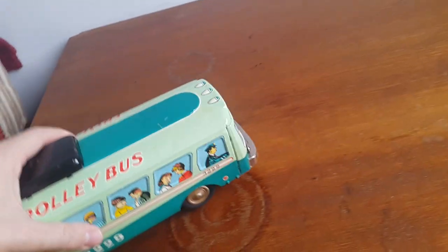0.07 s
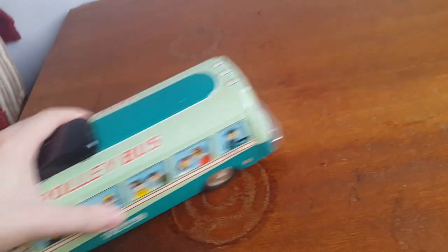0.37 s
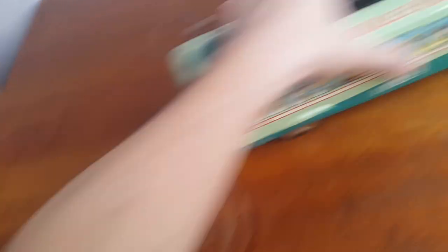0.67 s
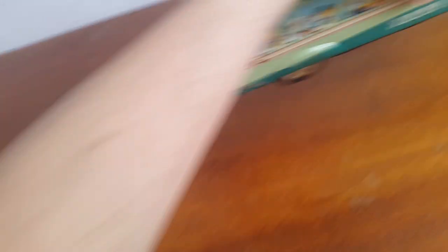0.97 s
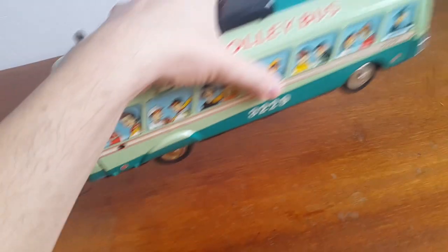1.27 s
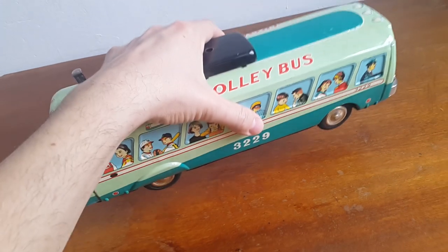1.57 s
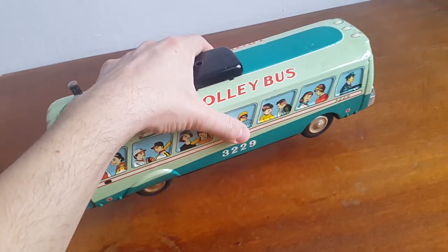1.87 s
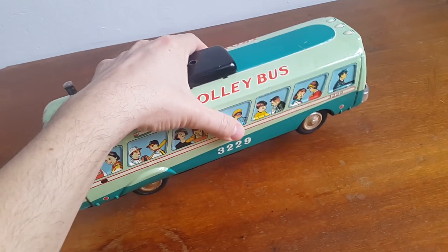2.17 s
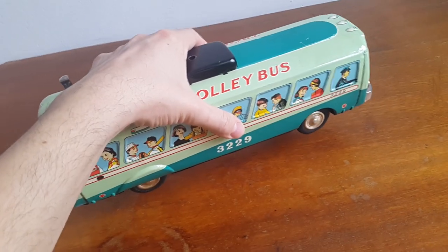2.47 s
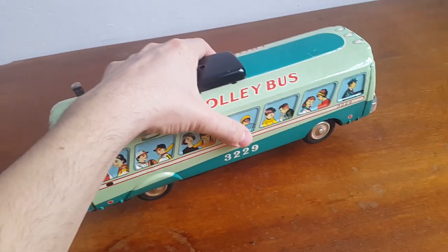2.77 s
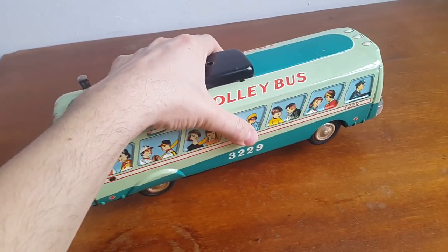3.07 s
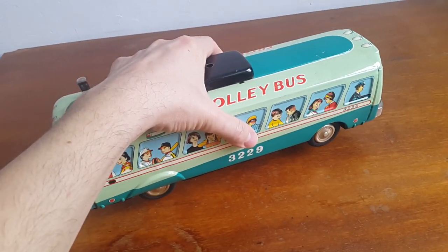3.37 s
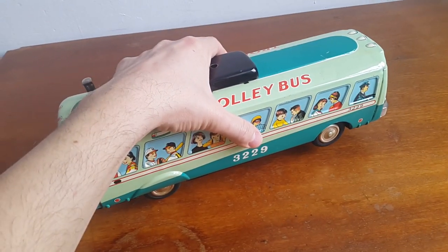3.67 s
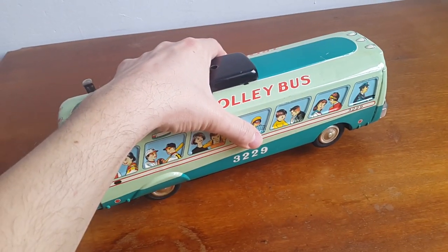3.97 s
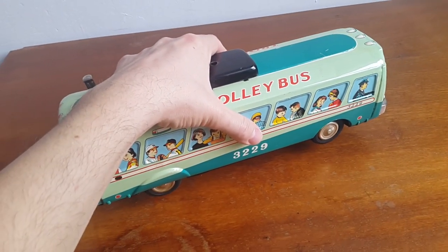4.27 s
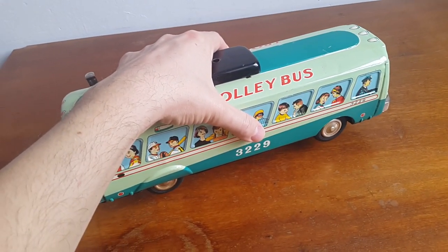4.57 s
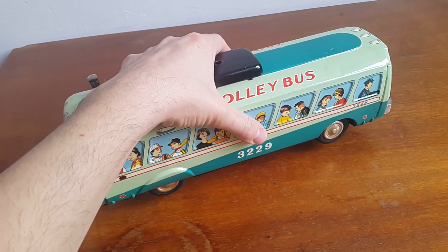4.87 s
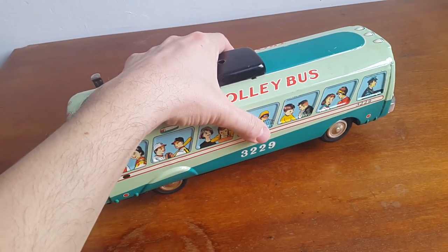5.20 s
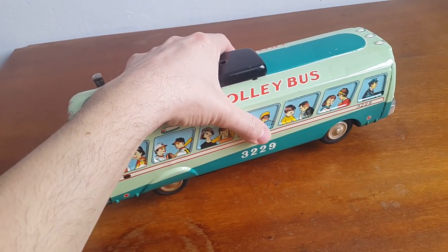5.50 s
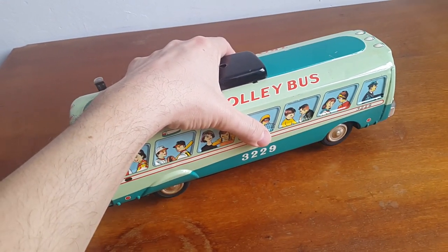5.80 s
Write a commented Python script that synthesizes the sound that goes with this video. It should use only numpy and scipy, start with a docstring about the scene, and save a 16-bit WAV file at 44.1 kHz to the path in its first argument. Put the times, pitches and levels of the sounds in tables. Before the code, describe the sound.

A tin toy bus clacks lightly as it is nudged, then is shoved across a wooden table, wheels drumming and axle rubbing while its friction motor winds up. After a sharp knock the flywheel runs on freely with a loud, steady whine that slowly falls in pitch, and loose gear teeth rattle the hollow metal body. It is heard close up and slightly to the left in a small room.

```python
"""The friction flywheel of a tin toy bus, shoved across a wooden table and lifted so that it runs on freely.
Its eight-tooth pinion whines and slowly sinks in pitch, the overtones swelling as they pass the panel
resonances, while loose gear teeth rattle the hollow tin body. During the shove the axles knock and rub
and the wheels drum on the wood. Small room, stereo microphones close by, the toy a little to the left."""
import sys
import numpy as np
from scipy import signal
from scipy.fft import rfft, irfft, next_fast_len
from scipy.io import wavfile
from scipy.ndimage import map_coordinates

SR = 44100
rng = np.random.default_rng(int(sys.argv[2]) if len(sys.argv) > 2 else 0)


def materialize(psi):
    """Save the field psi as 16-bit PCM at rate SR to the path in sys.argv[1].

    A 1-D psi becomes a single channel; in a 2-D psi each row is a channel.
    """
    bounded = np.clip(np.atleast_2d(psi).T, -1, 1)
    quanta = np.round(bounded * 32767).astype(np.int16)
    wavfile.write(sys.argv[1], SR, quanta)


N = 266364

# tone of the quiet room: (frequency [Hz], level [dB])
ROOM_TONE_COLOUR = [(15, -36), (25, -10), (109, -29), (146, -18), (529, -19), (5010, -41), (15000, -50)]
# reverberation of the small room: (frequency [Hz], t60 [s])
ROOM_DECAY = [(200, 0.07), (2000, 0.52), (12000, 0.29)]
# how alike the two microphones hear the toy: (frequency [Hz], likeness [0-1])
MIC_LIKENESS = [(60, 1), (200, 1), (550, 1), (1300, 0.65), (2000, 0.056), (3300, 0)]
# balance of the toy between the microphones: (frequency [Hz], left minus right [dB])
MIC_BALANCE = [(500, 0.5), (850, 3.5), (1200, 3.5), (1750, 10), (2700, 6.5), (4200, 7), (5600, 9.5),
               (6400, -1), (7600, -5.5), (10000, -4), (15000, 0)]
# the bus is nudged, shoved and drawn back: (start [s], attack [s], hold [s], release t60 [s], level [dB])
ROLL_STROKES = [(.28, 0.0098, 0.062, 0.34, -35), (.52, .12, 0.22, 0.32, -25), (.85, 0.066, .2, 3.6, -38.5)]
# the axle rubs as the hand bears down: (start [s], attack [s], hold [s], release t60 [s], level [dB])
RUB_STROKES = [(.28, 0.0086, 0.081, 0.31, -42), (.51, .2, .018, 0.061, -16)]
# tyres scuff the varnish: (start [s], attack [s], hold [s], release t60 [s], level [dB])
SCUFF_STROKES = [(.54, .26, .012, 0.2, -30.5)]
# colour of the wooden table top: (frequency [Hz], level [dB])
WOOD_COLOUR = [(40, -35), (100, -11.5), (160, -12), (230, -6), (480, 5.5), (620, -5.5), (900, -26),
               (2500, -54)]
# colour of the rubbing axle: (frequency [Hz], level [dB])
AXLE_COLOUR = [(200, -42), (450, -12), (700, -9.5), (1900, -10.5), (2200, -9), (2450, 4.5), (2780, -3),
               (3100, -23), (5000, -27.5), (8000, -25), (16000, -43)]
# colour of the scuffing tyres: (frequency [Hz], level [dB])
TYRE_COLOUR = [(4000, -30), (8500, -20), (11000, -4), (13000, -8), (16000, -15)]
# knocks of the body and axles: (time [s], level [dB], thud trim [dB])
AXLE_KNOCKS = [(0.2883, -12.5, 1), (0.291, -17, -19), (0.331, -21, -2), (0.3428, -20, -5),
               (0.3589, -16, -8), (0.4269, -28.5, -20), (0.5132, -40, -2), (0.754, -11, -1),
               (0.765, -20, 7.5)]
# colour of the struck tin: (frequency [Hz], level [dB])
TIN_COLOUR = [(60.0, -65), (130.0, -33.5), (250.0, -22.5), (440.0, -6.5), (750.0, 0.9), (1400.0, 2.5),
              (2300.0, -5), (3000.0, -6), (4300.0, -11), (7300.0, -11.5), (10000.0, -22), (15500.0, -29)]
# resonances of the hollow body: (frequency [Hz], width [Hz], boost [dB])
BODY_RESONANCES = [(348.8, 27.6, 10.5), (475.8, 33.4, 12), (584, 123, 8.5), (808, 31, 5.5), (1140, 29, 3.5),
                   (1617, 33, 6.5), (2037, 225, 9.5), (2385, 214, 9.5), (2630, 150, 6.5), (3600, 110, 4.5),
                   (5025, 21, 1)]
# the gears grind harshly for a moment: (middle [s], length [s], treble gain [dB], whine gain [dB])
GEAR_GRINDS = [(0.849, .045, 7, 2), (2.247, 0.14, 2, -1.5)]
# the gear bounces on every second tooth: (middle [s], length [s], lower tone [dB], upper tone [dB])
GEAR_BOUNCES = [(0.965, 0.26, -27, -42), (1.198, 0.13, -27.5, -33), (1.53, 0.075, -29, -45),
                (3.967, 0.52, -30.5, -41), (4.47, .32, -29.5, -34), (5.98, 0.71, -34, -50)]
# panel resonances the whine sweeps through: (frequency [Hz], width [Hz], level [dB], left minus right [dB])
PANEL_RESONANCES = [(530, 290, -21, 0), (839, 57, -25.5, 3.5), (867, 9.1, -24, 4), (901, 53, -27.5, 2),
                    (967, 49, -22, 5), (1005.6, 25, -25, 1), (1033, 32, -22.5, 0), (1082, 29, -24.5, 3.5),
                    (1153, 92, -28.5, 7), (1664, 40, -22.5, 7), (1698, 36, -25, 7), (1754, 49, -33, 16),
                    (1878, 30, -25, 8), (2023, 240, -30, 11), (2243, 29, -23, 9), (2290, 79, -23.5, 11.5),
                    (2504, 92, -21, 10), (2653, 62, -22, 4), (2730, 57, -23.5, 7.5), (2987, 40, -29.5, 9),
                    (3093, 70, -33, 2), (3438, 84, -34.5, 7), (3573, 120, -32, 18.5), (3640, 70, -34.5, 10),
                    (3740, 30, -39, 20), (3975, 38, -41, 16), (4195, 36, -40, 8)]
# tones of the pinion: (order [cycles per flywheel turn], level [dB], roughness [0-1])
PINION_TONES = [(8, 3.5, 0.05), (16, 0.5, 0.28), (24, 0.5, 0.13), (32, 1, 0.06), (7, -18, 0),
                (28, -16, 0.36), (29, -16, 0.8)]

TEETH, COAST_MESH_HZ = 8, 1152.7  # teeth on the pinion; teeth meshing per second early in the coast
LEFT_LEAD_S = 3e-5  # the toy is nearer the left microphone


def amp(db):
    """Decibels to gain."""
    return 10 ** (np.asarray(db) / 20)


def unit(x):
    """Scale to rms 1."""
    return x / np.sqrt(np.mean(x ** 2) + 1e-20)


def along(points, hz):
    """Read (frequency, value) points on a log frequency axis."""
    freqs, values = np.transpose(points)
    return np.interp(np.log(hz + 1), np.log(freqs + 1), values)


def pan(db):
    """Left and right gains that differ by db."""
    return amp(np.outer([.5, -.5], db))


def wobble(rate):
    """A smooth random curve, rate knots a second."""
    return map_coordinates(rng.standard_normal(int(N * rate / SR) + 4), [np.arange(N) * rate / SR])


def strokes(rows):
    """Gain of gestures that swell, hold and die away."""
    t = np.arange(N) / SR
    gain = np.zeros(N)
    for start, attack, hold, t60, db in rows:
        swell = np.clip((t - start) / attack, 0, 1) ** 2
        gain += swell * amp(db - 60 * np.maximum(t - start - attack - hold, 0) / t60)
    return gain


def bout(middle, length):
    """A round-topped swell from 0 to 1 and back."""
    return np.exp(-(2 * (np.arange(N) / SR - middle) / length) ** 4 / 2)


def filtered(x, gain):
    """x through the causal filter that has this gain of frequency."""
    size = 2 * next_fast_len(x.shape[-1] // 2 + 4096)
    cepstrum = irfft(np.log(np.maximum(gain(np.fft.rfftfreq(size, 1 / SR)), 1e-6)), size)
    cepstrum[..., 1:size // 2] *= 2  # folding the cepstrum gives minimum phase
    cepstrum[..., size // 2 + 1:] = 0
    return irfft(rfft(x, size) * np.exp(rfft(cepstrum)), size)[..., :x.shape[-1]]


def at_mics(pair, colour):
    """Two unrelated signals become one coloured source, merged in the bass and mostly leaning left."""
    size = next_fast_len(N + 4096, True)
    hz = np.fft.rfftfreq(size, 1 / SR)
    spread = np.arccos(np.clip(along(MIC_LIKENESS, hz), -1, 1)) / 2
    mid, side = rfft(pair, size) * [np.cos(spread), np.sin(spread)]
    balance = pan(along(MIC_BALANCE, hz))
    spectra = np.array([mid + side, mid - side]) * balance / np.hypot(*balance)
    return filtered(irfft(spectra, size)[:, :N], colour)


def room_tone():
    """The quiet room: a low, steady noise, unrelated at the two microphones."""
    return unit(filtered(rng.standard_normal((2, N)), lambda hz: amp(along(ROOM_TONE_COLOUR, hz))))


def reverb(x):
    """The near walls answer; the middle frequencies ring longest."""
    hz, t, spectra = signal.stft(rng.standard_normal((2, SR // 3)), SR, nperseg=256)
    decay = amp(-60 * t / along(ROOM_DECAY, hz)[:, None])
    tail = signal.istft(spectra * decay, SR, nperseg=256)[1]
    return signal.fftconvolve(x, tail / np.linalg.norm(tail[0]), axes=1)[:, :N]


def wood(hz):
    """Gain of the wooden table top."""
    return amp(along(WOOD_COLOUR, hz))


def tin(hz):
    """Gain of the tin body: a broad hump with hollow resonances on it."""
    boost_db = sum(db / (1 + (2 * (hz - centre) / width) ** 2) for centre, width, db in BODY_RESONANCES)
    return amp(along(TIN_COLOUR, hz) + boost_db)


def contact(crack_t60, ring_t60, ring_db):
    """One hard touch: a crack and the dense ring that follows, at both microphones."""
    t = np.arange(SR // 5) / SR
    return rng.standard_normal((2, len(t))) * (amp(-60 * t / crack_t60) + amp(ring_db - 60 * t / ring_t60))


def rolling():
    """The wheels drum and scuff on the table and the loaded axle rubs during the shove."""
    bumps, slips = amp(1.8 * np.tanh(wobble(90))), amp(2.7 * np.tanh(wobble(250)))
    rumble = unit(at_mics(rng.standard_normal((2, N)) * bumps, wood))
    rub = unit(at_mics(rng.standard_normal((2, N)) * slips, lambda hz: amp(along(AXLE_COLOUR, hz))))
    grain = rng.standard_normal((2, N)) * amp(2.3 * wobble(550))
    scuff = unit(filtered(grain, lambda hz: amp(along(TYRE_COLOUR, hz))))
    return strokes(ROLL_STROKES) * rumble + strokes(RUB_STROKES) * rub + strokes(SCUFF_STROKES) * scuff


def knocks():
    """Play in the axles is taken up with clacks of tin and thuds on the wood."""
    clacks, thuds = np.zeros((2, 2, N + SR))
    for time, db, thud_trim_db in AXLE_KNOCKS:
        start = round(time * SR)
        clack = contact(crack_t60=0.013, ring_t60=0.12, ring_db=-3.0)
        thud = contact(crack_t60=0.046, ring_t60=0.071, ring_db=-23)
        clacks[:, start:start + clack.shape[1]] += amp(db) * clack
        thuds[:, start:start + thud.shape[1]] += amp(db + thud_trim_db + 11.5) * thud
    return at_mics(clacks[:, :N], tin) + at_mics(thuds[:, :N], wood)


def whirr(turns, uneven_db=5, spacing_error=0.073, highpass_hz=2700):
    """The same eight uneven teeth come round at every turn: a comb of tones in the ringing tin."""
    tooth = np.arange(1, int(turns[-1] * TEETH) - 1)
    size, offset = rng.standard_normal((2, TEETH))[:, tooth % TEETH]
    force = amp(uneven_db * size)
    at = np.interp(tooth + spacing_error * offset, turns * TEETH, np.arange(N))
    whole, part = at.astype(int), at % 1  # each blow is shared between two samples
    blows = np.bincount(whole, force * (1 - part), N) + np.bincount(whole + 1, force * part, N)
    ring = contact(crack_t60=0.00057, ring_t60=0.059, ring_db=20.5)
    comb = signal.oaconvolve(blows[None], ring, axes=1)[:, :N]
    return unit(filtered(comb, lambda hz: 1 / np.sqrt(1 + (highpass_hz / (hz + 1)) ** 6)))


def rattle(turns, scatter_teeth=.22, size_db=3.5, eccentric_db=1.0, idler_db=0.44, spots=6):
    """Loose teeth strike early or late, harder once a flywheel turn and once a turn of the slow gear."""
    tooth = np.arange(1, int(turns[-1] * TEETH) - 1)
    late, size, spot_draw = rng.standard_normal((len(tooth), 3)).T
    at = np.interp(tooth + scatter_teeth * late, turns * TEETH, np.arange(N)).astype(int)
    angle = 2 * np.pi * tooth / TEETH
    swing_db = eccentric_db * np.sin(angle) + idler_db * np.sin(angle / 9)
    force = amp(size_db * np.minimum(size, 2) + swing_db)
    spot = np.argsort(spot_draw) % spots
    hits = np.zeros((2, N))
    for k in range(spots):  # every contact spot rings in its own way
        blows = np.bincount(at, force * (spot == k) * np.sign(late), N)
        ring = contact(crack_t60=0.0018, ring_t60=0.074, ring_db=-12.5)
        hits += signal.oaconvolve(blows[None], ring, axes=1)[:, :N]
    return unit(hits)


def clatter_gain(mesh_hz, load, db, load_db, knee_hz, steepness, loose_db=3, loose_hz=1081, width_hz=3.4):
    """Clatter grows with speed up to a ceiling; it is louder under load, and once the teeth run loose."""
    loose = (1 - load) * (1 + np.tanh((loose_hz - mesh_hz) / width_hz / 2)) / 2
    drive = (mesh_hz / knee_hz) ** steepness
    return amp(db + load_db * load + loose_db * loose) * np.sqrt(drive / (1 + drive))


def clatter(mesh_hz, load, turns, whirr_db=-6, split_hz=3900):
    """Rattle and whirr sound through the tin body; its treble has a strength of its own."""
    gears = at_mics(rattle(turns) + amp(whirr_db) * whirr(turns), tin)
    body = unit(filtered(gears, lambda hz: 1 / np.sqrt(1 + (hz / split_hz) ** 10)))
    treble = unit(filtered(gears, lambda hz: 1 / np.sqrt(1 + (split_hz / (hz + 1)) ** 10)))
    body *= clatter_gain(mesh_hz, load, db=-24.5, load_db=3.5, knee_hz=330, steepness=3.5)
    treble *= clatter_gain(mesh_hz, load, db=-31.5, load_db=2.5, knee_hz=520, steepness=6)
    grind_db = sum(db * bout(middle, length) for middle, length, db, _ in GEAR_GRINDS)
    return body + amp(grind_db) * treble


def tone(cycles, rough, lead_rad, flutter_rate=70):
    """A stereo sine of rms 1 whose strength and phase flutter; the left side leads by lead_rad."""
    phase = 2 * np.pi * cycles + rough * wobble(flutter_rate) + np.outer([.5, -.5], lead_rad)
    return unit((1 + rough * wobble(flutter_rate)) * np.cos(phase))


def bouncing(turns, rough=.3, left_db=5):
    """Skipping every second tooth, the gear sings halfway between its meshing harmonics."""
    lower, upper = (tone(ratio * TEETH * turns, rough, wobble(3)) for ratio in (2.5, 3.5))
    song = sum(bout(middle, length) * (amp(lower_db) * lower + amp(upper_db) * upper)
               for middle, length, lower_db, upper_db in GEAR_BOUNCES)
    return song * pan(left_db)


def panels(hz, floor_db=-63):
    """Gain with which the tin panels radiate a tone of this pitch to each microphone."""
    grid = np.arange(0, SR / 4, 2)
    power = (amp(floor_db) * pan(3)) ** 2
    for centre, width, db, left_db in PANEL_RESONANCES:
        peak = amp(db) * pan(left_db) / (1 + (2 * (grid - centre) / width) ** 2)
        power = power + peak ** 2
    return np.array([np.interp(hz, grid, np.sqrt(side)) for side in power])


def whine(mesh_hz, load, turns, gain_db=1, overtone_load_db=-11, flare_db=1.2, growth=0.97):
    """Meshing harmonics and the side tones of an off-centre pinion, sweeping through the panels."""
    tones = np.zeros((2, N))
    for order, db, rough in PINION_TONES:
        hz = order * mesh_hz / TEETH
        if order < 2 * TEETH:
            lead_rad = 2 * np.pi * hz * LEFT_LEAD_S
        else:  # overtones come from many patches of tin, reach the microphones out of step and flare
            lead_rad = 2.0 * wobble(3)
            db = db + overtone_load_db * load + flare_db * wobble(24)
        tones += amp(db) * panels(hz) * tone(order * turns, rough, lead_rad)
    grind_db = sum(db * bout(middle, length) for middle, length, _, db in GEAR_GRINDS)
    return tones * amp(gain_db + grind_db) * (mesh_hz / COAST_MESH_HZ) ** growth


def flywheel(lift_s=.86, swing_s=.19, unload_s=0.01, sag_hz_per_s=67.9, easing_hz_per_s2=2.1):
    """Mesh rate [Hz] and gear load [0-1]: the hand spins the flywheel up, then friction slows it."""
    t = np.arange(N) / SR - lift_s
    before, after = np.minimum(t, 0), np.maximum(t, 0)
    spin_up = np.exp(-(before / swing_s) ** 2) * (t > -2 * swing_s)
    coast_hz = COAST_MESH_HZ - sag_hz_per_s * after + easing_hz_per_s2 * after ** 2 / 2
    overshoot_hz = 6 * np.exp(-after / .22)  # a little extra speed, lost just after the lift
    load = (1 - np.tanh(t / unload_s)) / 2
    return (coast_hz + overshoot_hz) * spin_up, load


def scene():
    """One flywheel drives whine and clatter close to the microphones, with the room faint behind."""
    mesh_hz, load = flywheel()
    turns = np.cumsum(mesh_hz) / SR / TEETH
    noises = clatter(mesh_hz, load, turns) + rolling() + knocks()
    background = amp(-65) * room_tone()
    tones = whine(mesh_hz, load, turns) + bouncing(turns)
    return background + amp(-9) * reverb(noises) + noises + tones


def record(dry, top_hz=15850):
    """The microphone chain passes nothing above top_hz."""
    size = next_fast_len(N + SR // 2)
    passband = np.fft.rfftfreq(size, 1 / SR) < top_hz
    return irfft(rfft(dry, size) * passband, size)[:, :N]


dry = scene()
out = record(dry)
materialize(out)
```